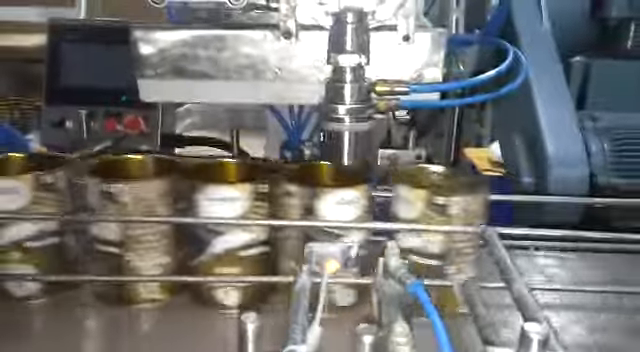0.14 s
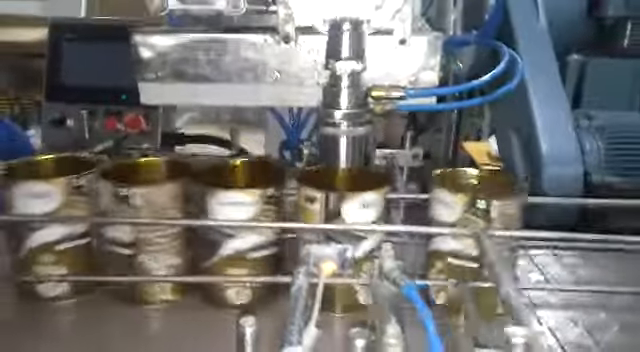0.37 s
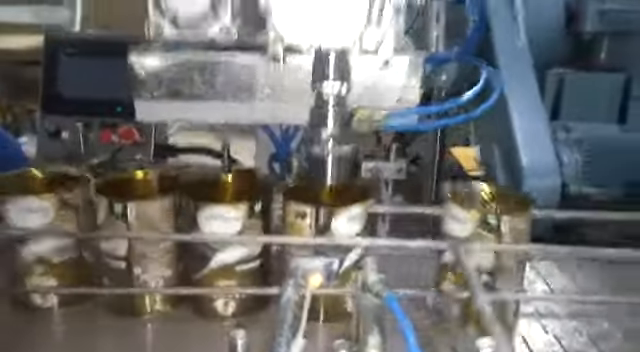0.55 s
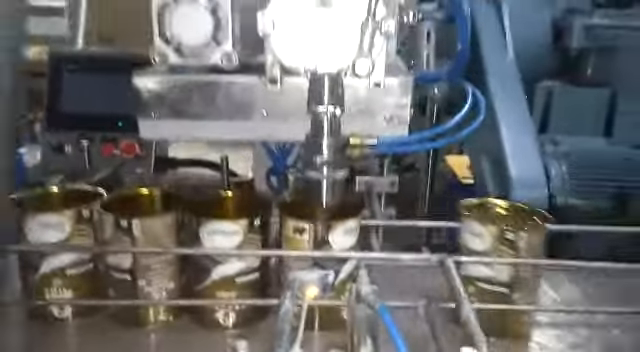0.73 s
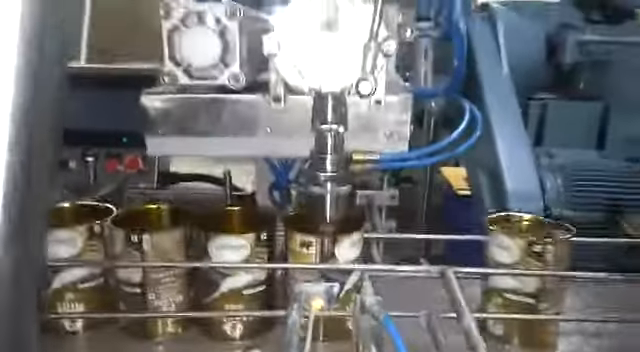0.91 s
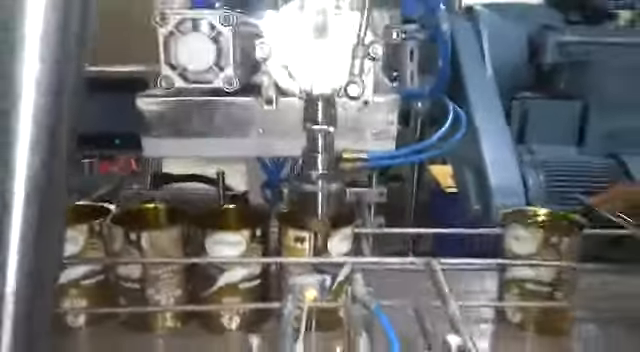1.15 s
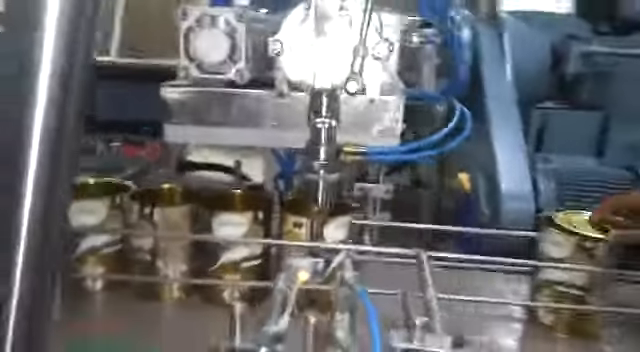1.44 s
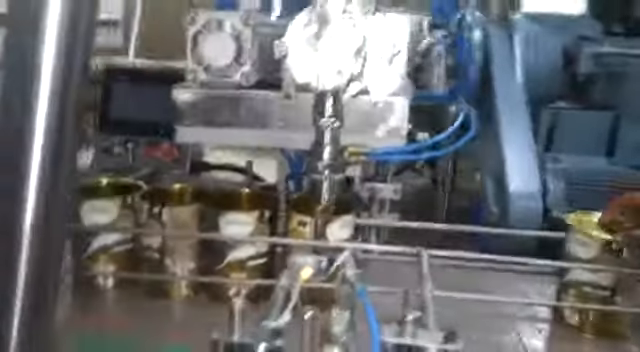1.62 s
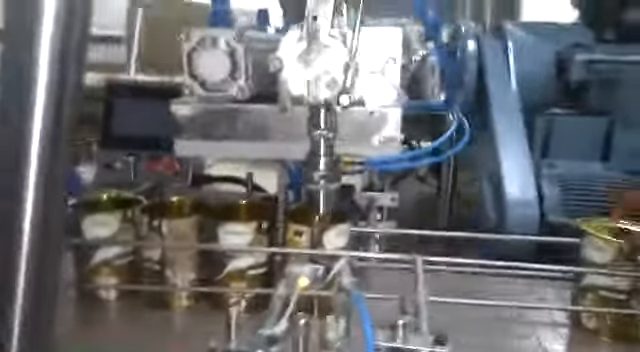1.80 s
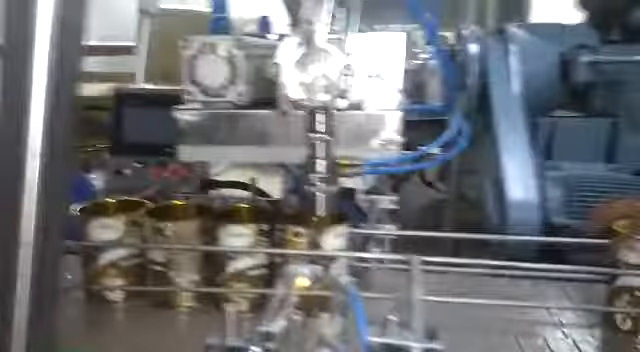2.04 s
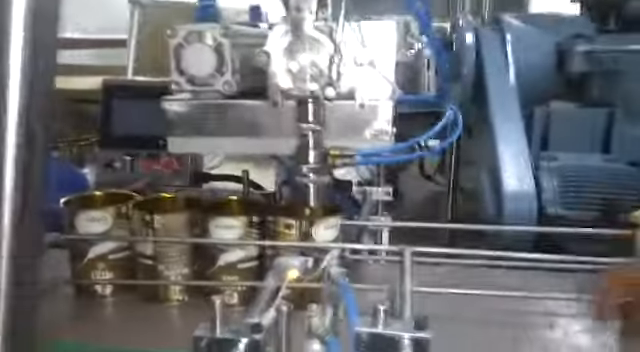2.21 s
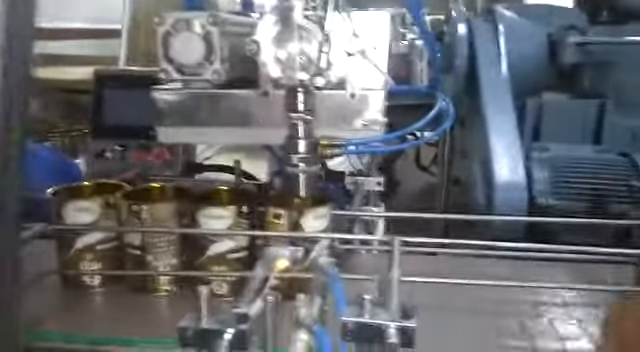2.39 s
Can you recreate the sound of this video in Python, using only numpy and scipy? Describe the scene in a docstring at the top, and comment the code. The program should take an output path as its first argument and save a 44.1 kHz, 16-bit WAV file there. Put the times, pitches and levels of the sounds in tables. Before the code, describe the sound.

A can filling machine roars and hums while metal cans clank and rattle in a factory.

```python
"""A can filler and its conveyor in a factory hall, from close by. After a short silence, machine roar,
mains hum, hiss and a thin high whine come in, and cans and steel parts clank and rattle in a tight run,
with bright cracks and hollow thuds of frame and cans. The knocks thin out and the hum comes forward.
Then three softer strokes each let off a puff of air, and a few last knocks land as the roar sinks.
The hall rings on behind each hit; left and right are alike except in the treble."""
import sys
import numpy as np
from scipy import signal
from scipy.fft import rfft, irfft
from scipy.io import wavfile
from scipy.ndimage import uniform_filter1d, map_coordinates

SR = 44100
rng = np.random.default_rng(int(sys.argv[2]) if len(sys.argv) > 2 else 0)


def transcribe(u):
    """Save the signal u as a 16-bit wav file named by the first command-line argument.

    u: samples, shape (n,) or (channels, n), limited to [-1, 1]; the rate is SR.
    q: integer samples, one column per channel.
    """
    v = np.clip(np.atleast_2d(u).T, -1, 1)
    q = np.round(v * 32767).astype(np.int16)
    wavfile.write(sys.argv[1], SR, q)


N = 112454

# Cans and steel parts knocking. Each row: start in seconds, level in dB, ring pitch in Hz, ring over
# rattle in dB, treble tilt in dB per half octave, low shelf in dB, then rise, hold and t60 in seconds.
CLANKS = [(0.218, -44, 4330, -1, 2.5, 3.5, 0.0015, 0.045, 1),
          (0.295, -40.5, 2440, -8, -5.5, -13, 0.0019, 0.016, 0.35),
          (0.447, -38, 2280, 0, -1, -9, 0.0017, 0.0089, 0.14),
          (0.555, -38.5, 4253, -6.5, -2.5, -12, 0.039, 0.013, 0.18),
          (.616, -34, 2750, -9.5, 1.5, -3.5, 0.0058, 0.0059, 0.33),
          (0.633, -36.5, 4220, -1.5, -5, -7, 0.0018, 0.019, 0.28),
          (0.702, -43, 5100, -17, -8, -7, .003, 0.0068, 0.27),
          (0.777, -37.5, 4030, -15, -0.5, -14, 0.0018, 0.0095, 0.057),
          (0.794, -43.5, 5490, 5.5, 3, -10, 0.0012, 0.0031, 0.063),
          (0.8455, -36, 2480, 3, 4, -4, 0.0045, 0.002, 0.1),
          (0.9365, -36.5, 3500, 1.5, -2, -5, 0.002, 0.003, 0.07),
          (0.951, -49, 4050, 0, -2, -3, 0.0026, 0.028, 0.31),
          (1.102, -46, 1720, -6, -10, -8, 0.0032, 0.011, 0.48),
          (1.534, -50, 4330, -4, 1.5, 2.5, 0.003, 0.044, 0.48),
          (1.605, -50, 4060, 6, -13, 4, 0.001, 0.0033, 0.073),
          (1.74, -51.5, 3010, -4, 6, 1, 0.0089, 0.052, 0.93),
          (2.088, -50.5, 2280, -6, -2, -1.5, 0.0084, 0.021, 0.61),
          (2.298, -53.5, 2760, -5.5, -0.5, 6, 0.01, 0.053, 0.39),
          (2.452, -56.5, 2480, 0.5, 4, 13, 0.0017, 0.0069, 0.056),
          (2.534, -46.5, 2420, -6, -5, 5, 0.01, .02, .2)]
# The EQ of rattling thin metal. Each row: frequency in Hz, relative level in dB.
RATTLE_EQ = [(150, -65), (500, -9.5), (1300, -7.5), (3400, -9.5), (4300, -7.5), (6300, -12.5), (8000, -22),
             (14300, -42.5)]
# Bright cracks as metal first meets metal. Each row: start in seconds, level in dB.
CRACKS = [(.2955, -43), (.7753, -34), (.8455, -40)]
# Hollow thuds of frame and cans. Each row: start in seconds, level in dB, pitch in Hz,
# resonator width in Hz, then rise, hold and t60 in seconds.
THUDS = [(.24, -56, 206.5, 22.8, 0.0088, 0.41, 0.45), (0.307, -49, 359, 60, 0.018, 0.014, 0.19),
         (0.446, -52, 578, 49, 0.003, 0.012, 0.17), (0.613, -43, 630.6, 68.4, 0.0044, 0.078, 0.24),
         (.62, -43, 495, 82, 0.016, 0.063, 0.12), (0.636, -48, 91.8, 23.2, 0.018, 0.023, 0.23),
         (0.843, -43.5, 816, 200, 0.0022, 0.0075, 0.056), (1.731, -47, 315, 110, 0.019, 0.039, 0.54),
         (1.742, -50, 119.4, 29, 0.012, 0.022, 0.37), (1.758, -55.5, 556, 1010, 0.012, 0.13, 0.85),
         (2.066, -54, 580, 164, 0.0085, 0.095, 0.89), (2.071, -58, 341, 136, 0.017, 0.095, 0.46),
         (2.304, -57.5, 983, 150, 0.012, 0.028, 0.22), (2.452, -52.5, 854, 95, 0.0034, 0.01, 0.12),
         (2.526, -52.5, 511, 53, 0.0062, .02, 0.26)]
# Air let off at a stroke. Each row: start in seconds, level in dB, centre in Hz, hold in seconds.
PUFFS = [(1.733, -60, 5900, 0.039), (2.074, -59, 7100, 0.067), (2.303, -61, 5400, 0.07)]
# Faders of the machine roar. Each row: time in seconds, low layer in dB, high layer in dB.
ROAR_LEVELS = [(.23, -49.5, -55), (.54, -51.5, -50.5), (.8, -49.5, -46.5), (1.2, -54, -52),
               (1.55, -51, -54.5), (1.72, -60.5, -62.5), (1.78, -51.5, -53.5), (2.05, -63, -68),
               (2.14, -59, -58), (2.27, -63, -67), (2.37, -59, -59), (2.55, -61, -64.5)]
# The EQs of the low and the high roar. Each row: frequency in Hz, relative level in dB.
LOW_ROAR_EQ = [(30, -45), (60, -13), (130, -6.5), (250, -11), (420, -8), (670, -11), (1000, -19),
               (1500, -57)]
HIGH_ROAR_EQ = [(600, -36), (1000, -1.5), (3000, -4), (5800, -8), (7000, -37), (9000, -33), (14000, -45)]
# Faders of the mains hum and of the octave below it. Each row: time in seconds, level in dB.
HUM_LEVELS = [(.3, -80), (.38, -52.5), (.44, -62), (.56, -62), (.95, -62), (1.08, -54), (1.4, -54),
              (1.6, -52.5), (1.72, -62), (1.85, -54), (1.9, -62.5), (2.05, -64), (2.3, -68.5), (2.55, -85)]
SUB_HUM_LEVELS = [(.23, -83), (.6, -64), (.9, -62.5), (1.5, -71), (2.0, -81)]
# Fader of the hiss. Each row: time in seconds, level in dB.
HISS_LEVELS = [(.23, -58.5), (.55, -59.5), (1.0, -68), (1.6, -71), (2.55, -65)]
# The EQ of the hiss. Each row: frequency in Hz, relative level in dB.
HISS_EQ = [(3000, -27), (6000, 15.5), (10000, 9.5), (14300, -4.5)]
# The drift of the whine. Each row: time in seconds, pitch in Hz.
WHINE_PITCH = [(.95, 10390), (1.1, 10470), (1.33, 10280), (1.36, 10470), (1.48, 10310), (1.65, 10380),
               (1.86, 10260), (1.97, 10420), (2.19, 10250), (2.29, 10340), (2.5, 10220)]
# How long the hall rings. Each row: frequency in Hz, t60 in seconds.
HALL_DECAY = [(300, 1), (3000, 0.55), (7000, 0.69), (12000, 0.18)]
# Left/right difference in the treble. Each row: frequency in Hz, send to the side signal in dB.
SIDE_EQ = [(4000, -70), (4300, -55), (6500, -7.5), (8500, -4), (14000, -4)]

HIT_SAMPLES = 2 ** 14


def clanks():
    """Each knock is an uneven rattle of thin metal with one ring standing out, and a ping at its peak."""
    out = np.zeros(N)
    tilt_hz, shelf_hz = 3200, 2680
    for start, db, hz, ring_db, tilt_db, shelf_db, rise, hold, t60 in CLANKS:
        def colour(f):
            treble = tilt_db * np.log2(1 + (f / tilt_hz) ** 2)
            bass = shelf_db / (1 + (f / shelf_hz) ** 4)
            return amp(eq_db(RATTLE_EQ, f) + treble + bass)

        rattle = noise(colour, HIT_SAMPLES)
        ring = noise(resonance(hz, width_hz=.14 * hz), HIT_SAMPLES)
        flutter_db = 2.5 * min(1, .006 / rise) ** 2  # attacks slower than 6 ms rattle more evenly
        rattle *= amp(flutter_db * wobble(300, HIT_SAMPLES))
        place(out, start, amp(db) * unit_rms(rattle + amp(ring_db) * ring), rise, hold, t60)
        ping = amp(db + ring_db + 4.5) * tone(hz)
        place(out, start, ping, rise, hold=0, t60=.028)
    return out


def cracks():
    """Metal first meets metal: an instant attack of bright, wide noise."""
    out = np.zeros(N)
    for start, db in CRACKS:
        crack = noise(resonance(5000, width_hz=5000), HIT_SAMPLES)
        place(out, start, amp(db) * crack, rise=0, hold=0, t60=.035)
    return out


def thuds():
    """Each thud shakes one hollow resonance of frame or cans; the narrower it is, the purer it sounds."""
    out = np.zeros(N)
    for start, db, hz, width_hz, rise, hold, t60 in THUDS:
        body = noise(lambda f: resonance(hz, width_hz)(f) ** 2, HIT_SAMPLES)
        note = np.sqrt(hz / width_hz) * amp(-13) * tone(hz)
        place(out, start, amp(db) * unit_rms(body + note), rise, hold, t60)
    return out


def air_puffs():
    """The filler lets off air at a stroke: a short burst of hiss around one pitch."""
    out = np.zeros(N)
    for start, db, hz, hold in PUFFS:
        air = noise(resonance(hz, width_hz=.14 * hz), HIT_SAMPLES)
        place(out, start, amp(db) * air, rise=.0059, hold=hold, t60=.3)
    return out


def machine_roar():
    """Motors and belts all over the hall: two restless noise beds, the low one with a narrow resonance."""
    low_db, high_db = automation(ROAR_LEVELS)
    low = eq_noise(LOW_ROAR_EQ) + amp(-9) * noise(resonance(874, width_hz=22))
    high = eq_noise(HIGH_ROAR_EQ)
    return amp(low_db) * flicker(low, depth_db=1.5) + amp(high_db) * flicker(high, depth_db=3.0)


def mains_hum():
    """A slightly wavering hum, locked to a second tone an octave below."""
    hum_hz = 99.3 + .5 * wobble(8.06)
    phase = 2 * np.pi * np.cumsum(hum_hz) / SR
    hum = amp(*automation(HUM_LEVELS)) * np.sin(phase)
    sub = amp(*automation(SUB_HUM_LEVELS)) * np.sin(phase / 2)
    return np.sqrt(2) * (hum + sub)


def hiss():
    """A bed of bright noise, strongest under the opening knocks."""
    return amp(*automation(HISS_LEVELS)) * eq_noise(HISS_EQ)


def whine():
    """A thin high sine that drifts, with a fast tremble in level and pitch."""
    drift_hz, = automation(WHINE_PITCH)
    level_db = -75.5 + 1.6 * wobble(25)
    hz = drift_hz + 28 * wobble(60)
    return np.sqrt(2) * amp(level_db) * np.sin(2 * np.pi * np.cumsum(hz) / SR)


def hall_reverb(send):
    """The hall answers with a noise tail in which each frequency dies at its own speed."""
    hz, t, spectrum = signal.stft(rng.standard_normal(SR), SR, nperseg=256)
    decay = amp(-60 * t / eq_db(HALL_DECAY, hz)[:, None])
    tail = signal.istft(spectrum * decay, SR, nperseg=256)[1]
    return signal.fftconvolve(send, tail / np.linalg.norm(tail))[:N]


def treble_side(mid):
    """A side signal that follows the treble of the mix with random phases, so left and right differ only up
    top."""
    hz, _, spectrum = signal.stft(mid, SR, nperseg=512)
    power = np.abs(uniform_filter1d(np.abs(spectrum) ** 2, size=9, axis=0))
    level = np.sqrt(power) * amp(eq_db(SIDE_EQ, hz))[:, None]
    phases = np.exp(2j * np.pi * rng.random(spectrum.shape))
    return signal.istft(level * phases, SR, nperseg=512)[1][:N]


def amp(db):
    """dB to gain."""
    return 10 ** (np.asarray(db) / 20)


def unit_rms(x):
    """Scaled to rms 1."""
    return x / np.sqrt(np.mean(x ** 2) + 1e-20)


def eq_db(points, hz):
    """Reads a table of (Hz, value) points on a log frequency axis."""
    freqs, values = np.transpose(points)
    return np.interp(np.log(hz + 1), np.log(freqs + 1), values)


def automation(rows):
    """One value per sample for each column after the time."""
    times, *columns = np.transpose(rows)
    return [np.interp(np.arange(N) / SR, times, column) for column in columns]


def wobble(rate, size=N):
    """A smooth random curve, rate knots a second."""
    knots = rng.standard_normal(int(size * rate / SR) + 4)
    return map_coordinates(knots, [np.arange(size) * rate / SR])


def noise(gain, size=N):
    """Noise of rms 1 with a gain per frequency."""
    spectrum = rfft(rng.standard_normal(size)) * gain(np.fft.rfftfreq(size, 1 / SR))
    return unit_rms(irfft(spectrum, size))


def eq_noise(eq):
    """A noise bed coloured by an EQ table."""
    return noise(lambda f: amp(eq_db(eq, f)))


def tone(hz):
    """A sine of random phase, one hit long."""
    return np.sin(2 * np.pi * (hz * np.arange(HIT_SAMPLES) / SR + rng.random()))


def resonance(hz, width_hz):
    """The band-pass response of one resonator."""
    return lambda f: 1j * f * width_hz / (hz * hz - f * f + 1j * f * width_hz)


def flicker(x, depth_db):
    """Random patches of gain over time and frequency; the result has rms 1."""
    spectrum = signal.stft(x, nperseg=512)[2]
    patches = rng.standard_normal(spectrum.shape)
    patches = uniform_filter1d(uniform_filter1d(patches, 5, axis=0), 8, axis=1)
    return unit_rms(signal.istft(spectrum * amp(depth_db * unit_rms(patches)), nperseg=512)[1][:N])


def place(out, start, sound, rise, hold, t60):
    """Mixes in a hit under a rise, hold and decay, all in seconds."""
    t = np.arange(len(sound)) / SR
    attack = np.clip(t / max(rise, 1e-4), 0, 1)
    decay = amp(-60 * np.clip(t - rise - hold, 0, None) / t60)
    slot = out[round(start * SR):][:len(t)]
    slot += (sound * attack * decay)[:len(slot)]


def scene():
    """Hits and their reverb over the background beds; left and right differ in the treble only."""
    bright = clanks() + cracks() + air_puffs()
    hollow = thuds()
    mid = bright + hollow + hiss()
    mid += amp(-10.5) * hall_reverb(bright + amp(-3.5) * hollow)  # thuds fill the hall less
    mid += machine_roar() + mains_hum()
    side = treble_side(mid)
    return whine() + np.array([mid + side, mid - side])


def record(dry):
    """Silence, then a 1 ms fade-in; a steep low-pass takes off the very top."""
    start_s, top_hz = .2225, 14250
    gate = np.clip((np.arange(N) / SR - start_s) * 1000, 0, 1)
    lowpass = signal.ellip(12, .5, 60, top_hz, fs=SR, output="sos")
    return signal.sosfilt(lowpass, dry * gate)


dry = scene()
out = record(dry)
transcribe(out)
```